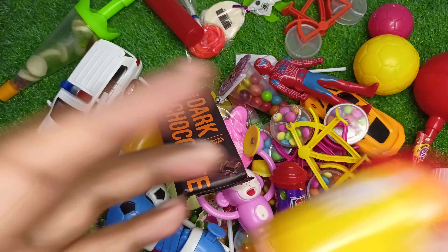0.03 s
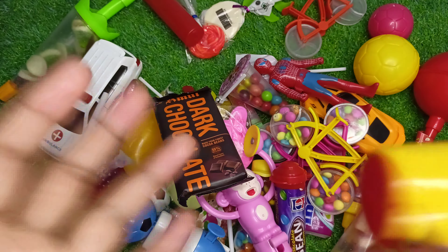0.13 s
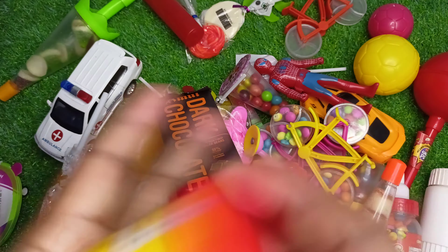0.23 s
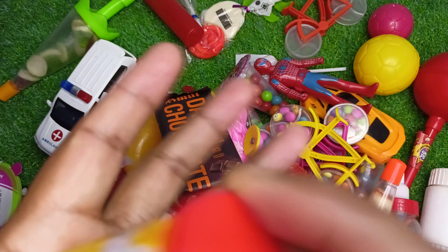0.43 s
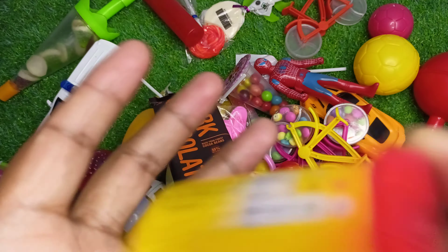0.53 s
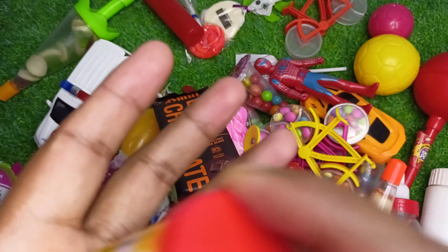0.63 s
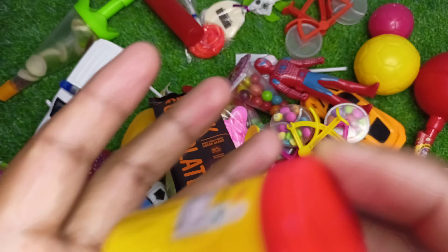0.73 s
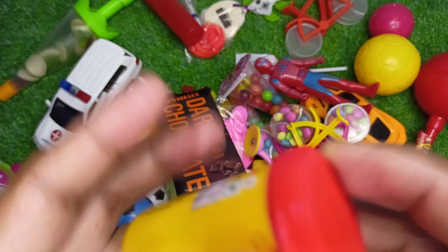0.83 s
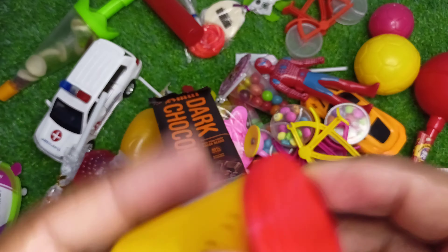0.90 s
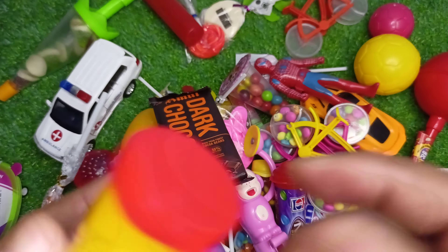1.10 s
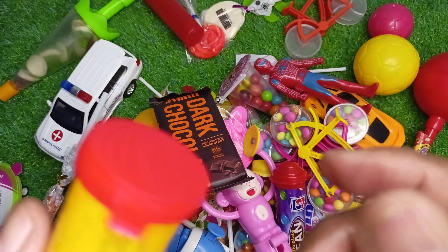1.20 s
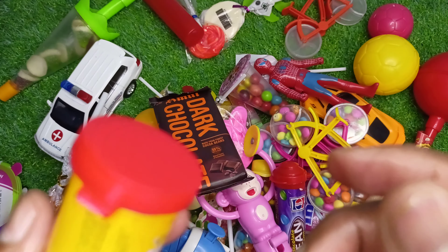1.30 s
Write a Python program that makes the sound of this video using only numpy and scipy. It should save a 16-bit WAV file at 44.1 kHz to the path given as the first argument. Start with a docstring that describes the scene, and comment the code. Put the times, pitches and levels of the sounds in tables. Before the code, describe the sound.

Candies shaken in a plastic tube, with sharp clicks, a thump and soft finger rustles.

```python
"""Hard candies in a plastic tube, turned and shaken close to the microphone in a small bright room.
Single candies tick against the wall, each a snap that rings wall and cap; then the whole load lands
five times, once with a thump of tube against hand that overloads the microphone. Fingers rustle
over the tube, a few last candies settle and the plastic squeaks faintly, over a low room rumble."""
import sys
import numpy as np
from scipy import signal
from scipy.fft import rfft, irfft, next_fast_len
from scipy.io import wavfile
from scipy.ndimage import map_coordinates

SR = 44100
rng = np.random.default_rng(int(sys.argv[2]) if len(sys.argv) > 2 else 0)


def log_audio(samples):
    """Write samples as a 16-bit WAV file to the path given in sys.argv[1]."""
    # one column per channel
    frames = np.atleast_2d(samples).T
    # limit to full scale, then quantise
    limited = np.clip(frames, -1, 1)
    pcm = np.round(limited * 32767).astype(np.int16)
    wavfile.write(sys.argv[1], SR, pcm)


N = 59535


def amp(db):
    return 10 ** (np.asarray(db) / 20)


def unit_rms(x):
    return x / np.sqrt(np.mean(x ** 2) + 1e-20)


def unit_energy(x):
    return x / (np.linalg.norm(x) + 1e-12)


def curve_at(points, hz):
    """Read (Hz, value) points along a log frequency axis."""
    freqs, values = np.transpose(points)
    return np.interp(np.log(hz + 1), np.log(freqs + 1), values)


def envelope(points):
    """Gain per sample from (seconds, dB) points."""
    return amp(np.interp(np.arange(N) / SR, *np.transpose(points)))


def wobble(knots_per_s):
    """A smooth random curve."""
    knots = rng.standard_normal(int(N * knots_per_s / SR) + 4)
    return map_coordinates(knots, [np.arange(N) * knots_per_s / SR])


def colour(x, points):
    """Minimum-phase filter with the gain of (Hz, dB) points."""
    size = 2 * next_fast_len(len(x))
    gain = amp(curve_at(points, np.fft.rfftfreq(size, 1 / SR)))
    cepstrum = irfft(np.log(gain), size)
    cepstrum[1:size // 2] *= 2  # folded forward, so nothing sounds ahead of a strike
    cepstrum[size // 2 + 1:] = 0
    return irfft(rfft(x, size) * np.exp(rfft(cepstrum)), size)[:len(x)]


def add(track, start_s, x):
    """Mix x into the track."""
    part = track[max(0, round(start_s * SR)):][:len(x)]
    part += x[:len(part)]


# The room's rumble behind the tube. Each row: frequency in Hz, gain in dB.
RUMBLE_SPECTRUM = [(25, -21), (70, -4.5), (140, 1), (210, -2.5), (290, -16.5), (450, -10), (900, -19),
                   (2000, -27), (8000, -36), (15000, -60)]
# The rumble at the microphone. Each row: time in seconds, level in dB.
RUMBLE_LEVEL = [(0, -39.5), (.15, -41), (.3, -50.5), (.9, -47.5), (1.1, -47.5), (1.35, -43.5)]
# Hum in the room. Each row: frequency in Hz, level in dB.
HUM_TONES = [(130, -59.5), (390, -66.5)]

def background():
    """Low rumble of the room, with a faint hum."""
    t = np.arange(N) / SR
    hum = sum(np.sqrt(2) * amp(db) * np.sin(2 * np.pi * hz * t + wobble(7.9)) for hz, db in HUM_TONES)
    rumble = unit_rms(colour(rng.standard_normal(N), RUMBLE_SPECTRUM))
    return hum + envelope(RUMBLE_LEVEL) * rumble


# The small room's decay. Each row: frequency in Hz, seconds to fall 60 dB.
ROOM_DECAY = [(200, 0.08), (1000, 1), (2600, 0.54), (7000, 0.43), (15000, 0.46)]
# What its walls send back to the microphone. Each row: frequency in Hz, gain in dB.
ROOM_SPECTRUM = [(100, -40), (600, -35), (1500, -3), (2400, -7), (3500, -5), (5500, 0), (8500, -1.5),
                 (11000, -4), (15500, -7)]

def room(x, positions=8, build_s=0.014, level_db=-5):
    """A bright diffuse tail, new for each position of the tube; each frequency dies at its own speed."""
    out = np.zeros(N)
    position = np.arange(N) * positions // N
    for k in range(positions):
        hz, t, noise = signal.stft(rng.standard_normal(SR), SR, nperseg=256)
        decay = amp(-60 * t / curve_at(ROOM_DECAY, hz)[:, None])
        build = 1 - np.exp(-t / build_s)
        _, tail = signal.istft(noise * decay * build, SR, nperseg=256)
        response = colour(unit_energy(tail), ROOM_SPECTRUM)
        out += signal.fftconvolve(x * (position == k), response)[:N]
    return amp(level_db) * out


# The plastic's squeak, faint even close up. Each row: start in seconds, pitch in Hz, level in dB.
SQUEAKS = [(1.236, 4011, -50), (1.285, 3115, -58), (1.28, 4457, -65)]

def squeak(swell_s=0.04, waver_hz=14, flutter_db=3):
    """The plastic squeaks in thin wavering tones that swell in at the end."""
    out, t = np.zeros(N), np.arange(N) / SR
    for start_s, hz, db in SQUEAKS:
        gain = np.sqrt(2) * amp(db + flutter_db * wobble(80))
        swell = np.clip((t - start_s) / swell_s, 0, 1)
        phase = 2 * np.pi * np.cumsum(hz + waver_hz * wobble(90)) / SR
        out += gain * swell * np.sin(phase)
    return out


# Sliding on the tube, heard close. Each row: time in seconds, level in dB.
RUSTLE_LEVEL = [(0, -34.5), (.06, -42.5), (.1, -65), (.16, -61), (.21, -68), (.24, -33), (.28, -26.5),
                (.31, -46), (.6, -68), (.99, -75), (1.02, -43.5), (1.05, -66), (1.11, -60), (1.15, -43.5),
                (1.23, -53.5), (1.35, -59)]
# The colour of that sliding. Each row: frequency in Hz, gain in dB.
RUSTLE_SPECTRUM = [(200, -21), (1000, -31), (2000, -10.5), (3300, -2.5), (5000, -0.5), (8000, -3),
                   (10500, -14), (15500, -10.5), (17500, -26)]

def rustle(slips_per_s=900, hiss_gain=0.13):
    """Fingers and candies slide over the plastic in tiny random slips."""
    slips = (rng.random(N) < slips_per_s / SR) * rng.standard_normal(N)
    hiss = hiss_gain * rng.standard_normal(N)
    return envelope(RUSTLE_LEVEL) * unit_rms(colour(slips + hiss, RUSTLE_SPECTRUM))


# The dull push of the hand. Each row: frequency in Hz, gain in dB.
PUSH_SPECTRUM = [(25, -22), (70, 8), (170, 15.5), (420, 10.5), (700, 1), (1200, -16.5), (3000, -50)]
# Two bumps by the microphone, one faint, one hard. Each row: start in seconds, relative level in dB.
HAND_BUMPS = [(0.211, -31), (0.3408, -1)]

def thumps(boom_hz=232, t60_s=0.01, rise_s=0.0016, boom_db=2.5, push_db=18.5):
    """The tube butts against the hand: a low push and a heavily damped boom."""
    out, t = np.zeros(N), np.arange(SR // 10) / SR
    rise = 1 - np.exp(-t / rise_s)
    boom = np.sin(2 * np.pi * boom_hz * t) * amp(-60 * t / t60_s) * rise
    impulse = 1.0 * (t == 0)
    push = unit_energy(colour(impulse, PUSH_SPECTRUM))
    for start_s, db in HAND_BUMPS:
        add(out, start_s, amp(db) * (amp(boom_db) * boom + amp(push_db) * push))
    return out


def ring(modes, t, scatter_db=2, detune=0.016):
    """Damped modes, struck at a new spot each time; grip and load shift their pitch from blow to blow."""
    hz, db, t60 = np.transpose(modes)[:, :, None]
    gain = amp(db + scatter_db * rng.standard_normal(hz.shape))
    sign = rng.choice([-1, 1], hz.shape)
    hz = hz * (1 + detune * rng.standard_normal(hz.shape))
    partials = sign * gain * amp(-60 * t / t60) * np.sin(2 * np.pi * hz * t)
    return unit_energy(partials.sum(axis=0))


# Candy on plastic, heard close. Each row: frequency in Hz, gain in dB.
CRACK_SPECTRUM = [(60, -32), (250, -14), (1000, -24), (2100, -17), (2900, -5), (3800, 1), (6000, -2),
                  (8000, 0), (10500, -9), (12500, -11), (14300, -8), (15500, -2), (16200, -4), (17500, -25)]
# The tube's wall. Each row: mode frequency in Hz, relative level in dB, seconds to fall 60 dB.
WALL_MODES = [(1537, -13, 0.03), (2240, -8, 0.024), (3805, 7, 0.024), (4292, 5.5, 0.026), (4575, 6, 0.012),
              (5120, 5, 0.024), (5740, 2.5, 0.04), (6000, 1, 0.022), (7270, 11, 0.018), (7970, 8.5, 0.031),
              (8810, 5, 0.023)]
# The tube's cap. Each row: mode frequency in Hz, relative level in dB, seconds to fall 60 dB.
CAP_MODES = [(2715, -3, 0.021), (2932, -5.5, 0.026), (3141, -3, 0.035), (3341, 0.5, 0.024)]

def contact(cap_db, treble_db=0, wall_db=-2.5, snap_db=8, snap_t60_s=0.0016, crack_t60_s=0.017):
    """One candy on the plastic: a snap, a brief crack and a short ring of wall and cap."""
    t = np.arange(SR // 25) / SR
    decay = amp(snap_db - 60 * t / snap_t60_s) + amp(-60 * t / crack_t60_s)
    spectrum = [(hz, db + treble_db * (hz > 10000)) for hz, db in CRACK_SPECTRUM]
    crack = unit_energy(colour(rng.standard_normal(len(t)) * decay, spectrum))
    wall = amp(wall_db) * ring(WALL_MODES, t)
    cap = amp(cap_db) * ring(CAP_MODES, t)
    return unit_energy(crack + wall + cap)


CLOSE_DB = 11  # gain on ticks and landings, for a tube right at the microphone
# Single candies, close up. Each row: start in seconds, relative level in dB,
# cap ring against the crack in dB, the crack's treble gain above 10 kHz in dB.
CANDY_TICKS = [(0.0181, -20, -2.5, 5), (0.0312, -26, 1.5, 9), (0.041, -17, 0.5, -10), (0.054, -26, -16, -7),
               (0.0567, -17, -20, 0), (0.0645, -22.5, 3, -8), (0.114, -28.5, -8, -38),
               (0.1755, -13.5, 6.5, -10), (0.1818, -18.5, 6, -18), (0.197, -19, 2, -10),
               (0.1988, -12.5, -5, -13.5), (.2075, -26, 10, -8), (0.211, -2.5, -20, -3.5),
               (0.2134, -11, -10, -5), (0.225, -13.5, -22, -21), (.226, -23, -10, -4),
               (0.231, -16.5, -12, -6), (0.2516, -11.5, 3, 27), (0.2559, -4.5, -2.5, -7),
               (.261, -16.5, -24, -13), (.268, -13, -26, -9), (.2757, -18, 16, 2),
               (0.2787, -12.5, -20, -13), (.2822, -34, -8, -3), (0.2868, -12, 2, 2), (0.2928, -21, -6, -15),
               (0.4562, -10.5, 3, -13), (.6573, -53, -5, 1), (1.0035, -30.5, -4, 1), (1.013, -31.5, -13, 3),
               (1.1044, -34.5, -16, 7), (1.128, -29, -19, 1), (1.136, -32, -16, -2), (1.1514, -19, -17, 8),
               (1.1567, -22.5, -12, 4), (1.1663, -21.5, 1, -8), (1.19, -18, -8.5, 12),
               (1.2065, -30, -16, 4), (1.225, -26, -7, 13), (1.327, -34, -11, -14)]

def ticks():
    """Single candies drop against the wall."""
    out = np.zeros(N)
    for start_s, db, cap_db, treble_db in CANDY_TICKS:
        add(out, start_s, amp(db) * contact(cap_db, treble_db))
    return amp(CLOSE_DB) * out


def bunch(lag_s, thinning_s, cap_db, candies=24, scatter_db=3, edge_db=-5):
    """Many candies arrive together, thickest at lag_s; the earliest and latest tend to strike softer."""
    out = np.zeros(SR // 5)
    for k in range(candies):
        rank = 2 * (k + rng.random()) / candies - 1  # -1 first, +1 last
        spread = 1 - np.sqrt(1 - abs(rank))  # 0 in the thick of the bunch, 1 at its edges
        start_s = lag_s + spread * (thinning_s if rank > 0 else -lag_s)
        db = scatter_db * rng.standard_normal() + edge_db * spread
        add(out, start_s, amp(db) * contact(cap_db))
    return unit_energy(out)


# The shakes, close up. Each row: start in seconds, first candy's relative level in dB,
# lag to the thickest part in seconds, thinning time in seconds, the bunch's relative level in dB,
# cap ring against the crack in dB.
LOAD_LANDINGS = [(.3387, -6, .003, .008, 6.5, -9), (.4697, -4, .0055, .011, 0, 5),
                 (.5156, -12, .0095, .014, 1.7, -13), (.6397, -9, .007, .006, -2, 0),
                 (.695, -13, .012, .011, 2.2, -9)]

def landings():
    """The whole load hits an end of the tube; one candy leads the rest."""
    out = np.zeros(N)
    for start_s, first_db, lag_s, thinning_s, bunch_db, cap_db in LOAD_LANDINGS:
        add(out, start_s, amp(first_db) * contact(cap_db))
        add(out, start_s, amp(bunch_db) * bunch(lag_s, thinning_s, cap_db))
    return amp(CLOSE_DB) * out


def scene():
    """The tube close to one microphone, with the room behind it."""
    shakes = landings() + thumps()
    handling = ticks() + rustle() + squeak()
    reverb = room(shakes + amp(-5) * handling)  # small sounds reach the room less than the whole load
    return (shakes + handling + reverb + background())[None]


def record(dry, top_hz=15900):
    """The recorder clips at full scale and keeps nothing above its band limit."""
    size = next_fast_len(N + SR // 2)
    clipped = np.clip(dry, -1, 1)
    in_band = np.fft.rfftfreq(size, 1 / SR) < top_hz
    return irfft(rfft(clipped, size) * in_band, size)[:, :N]


dry = scene()
out = record(dry)
log_audio(out)
```